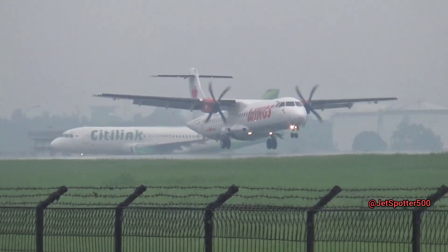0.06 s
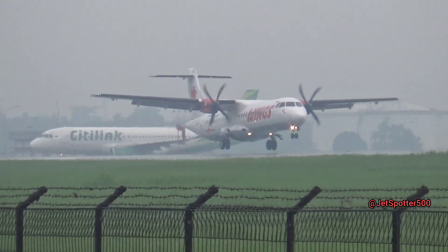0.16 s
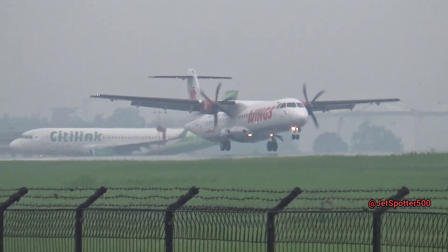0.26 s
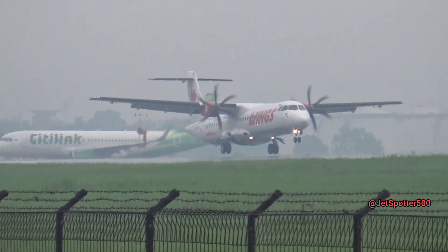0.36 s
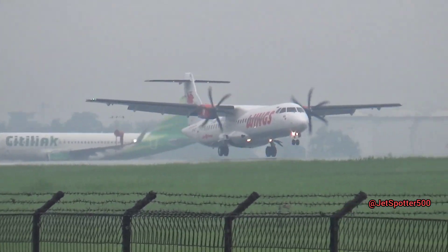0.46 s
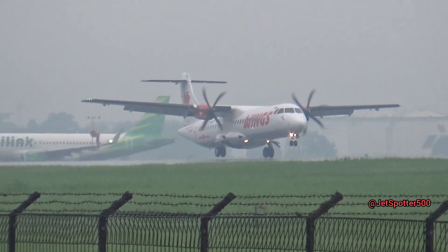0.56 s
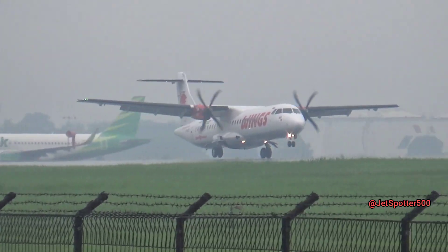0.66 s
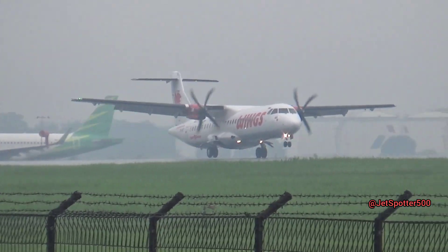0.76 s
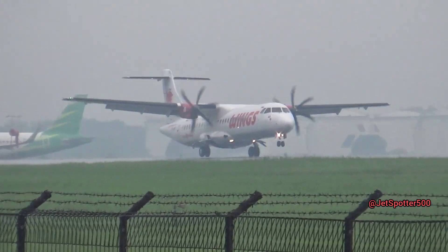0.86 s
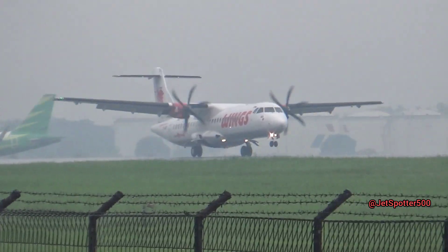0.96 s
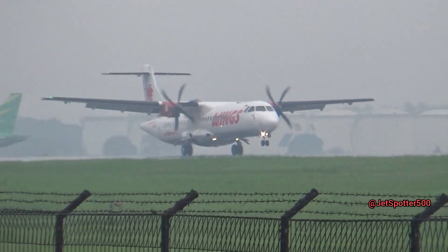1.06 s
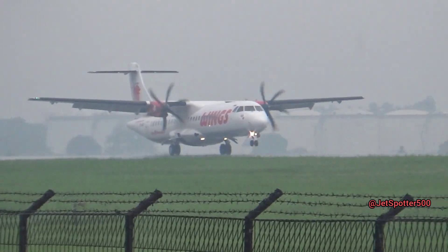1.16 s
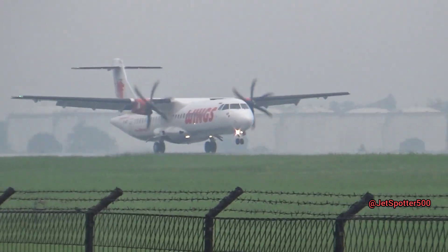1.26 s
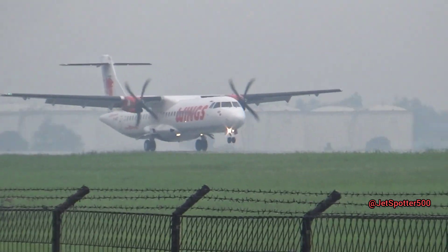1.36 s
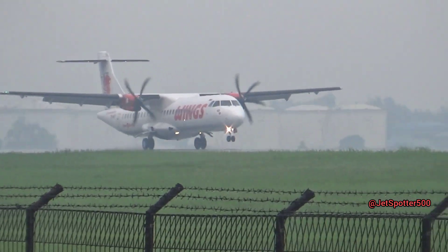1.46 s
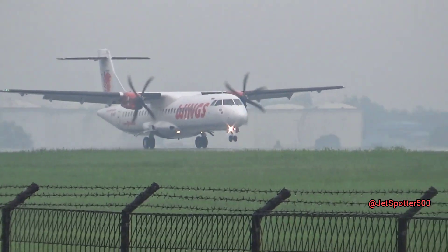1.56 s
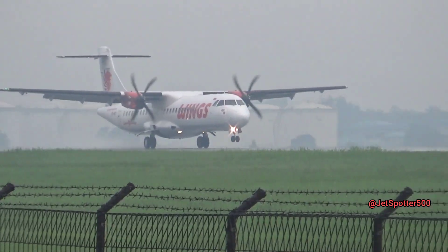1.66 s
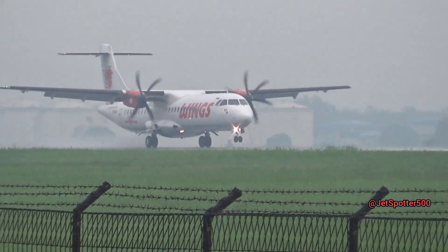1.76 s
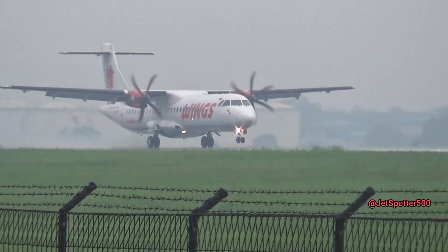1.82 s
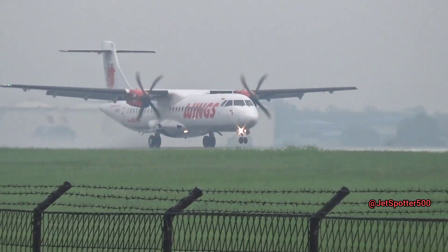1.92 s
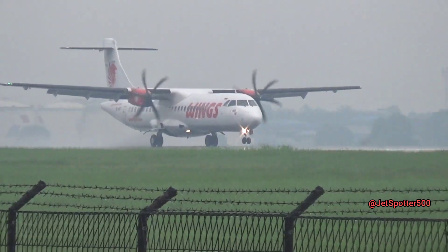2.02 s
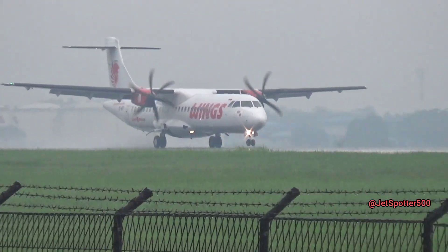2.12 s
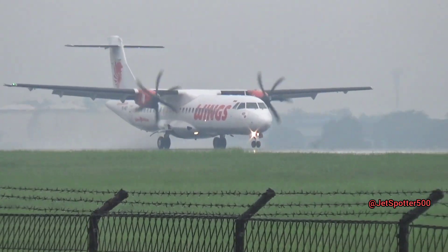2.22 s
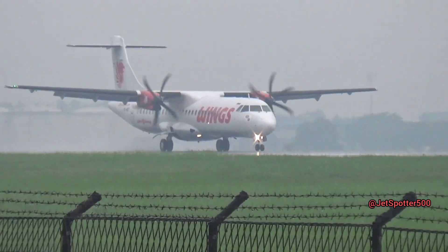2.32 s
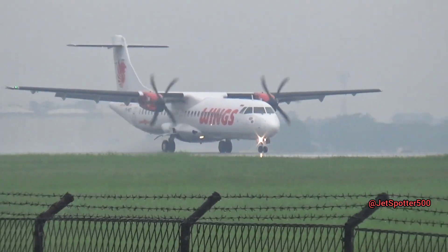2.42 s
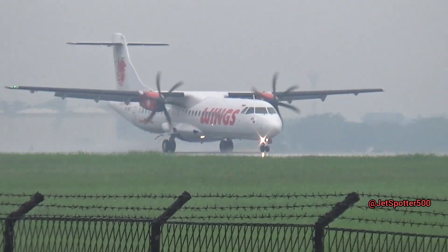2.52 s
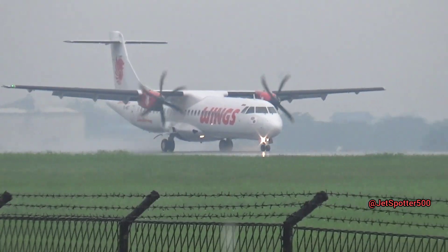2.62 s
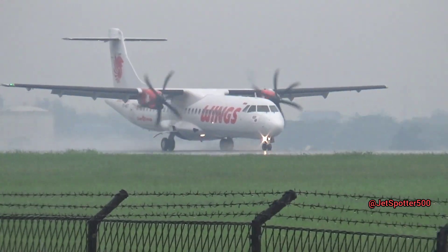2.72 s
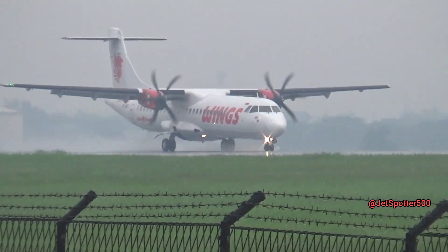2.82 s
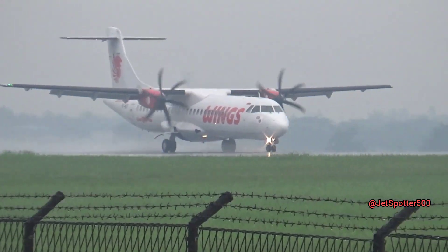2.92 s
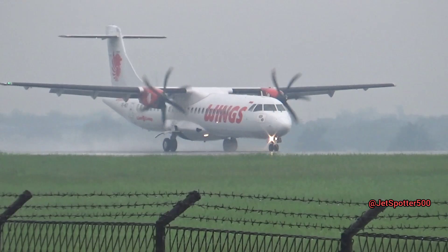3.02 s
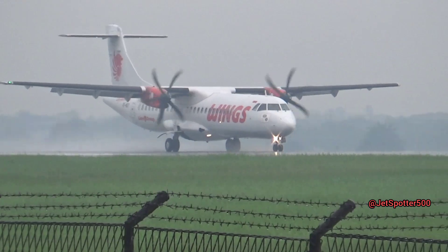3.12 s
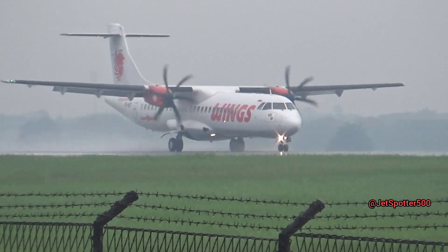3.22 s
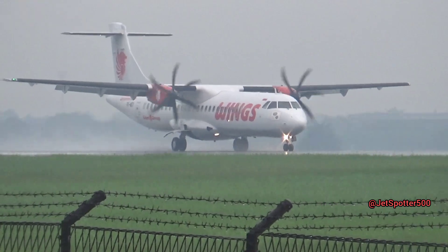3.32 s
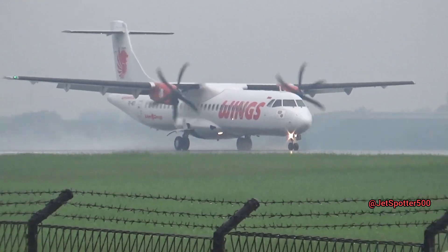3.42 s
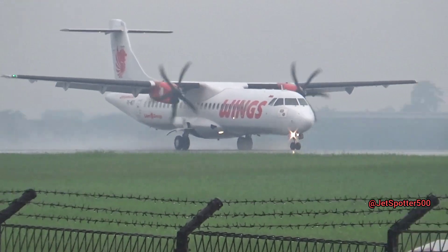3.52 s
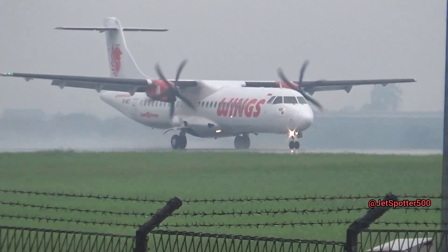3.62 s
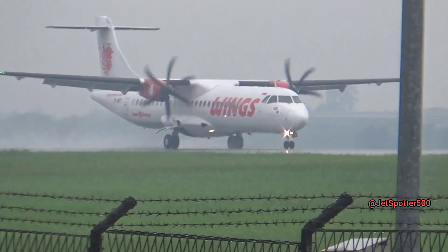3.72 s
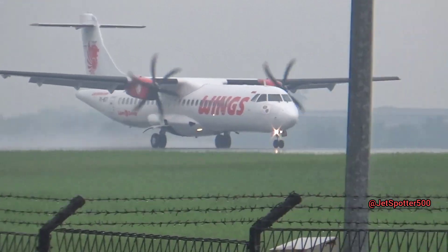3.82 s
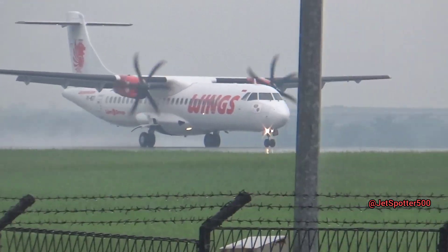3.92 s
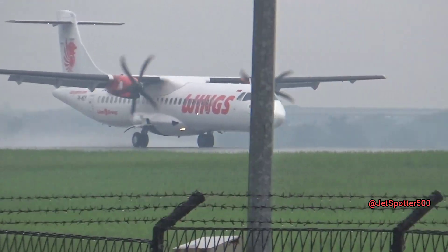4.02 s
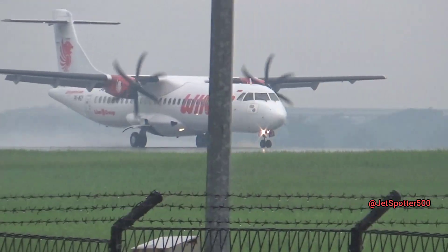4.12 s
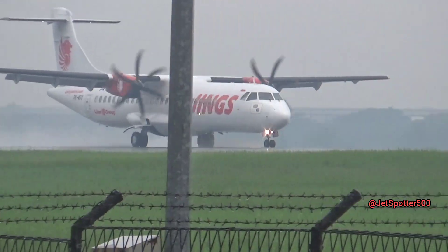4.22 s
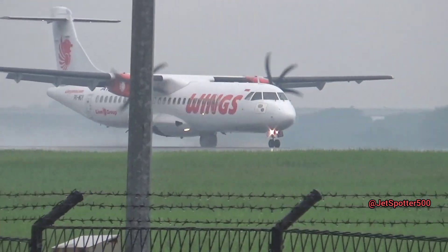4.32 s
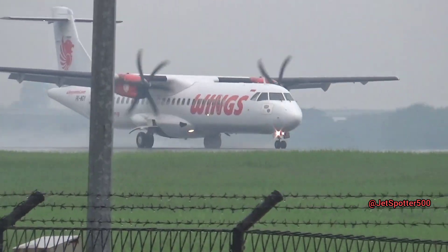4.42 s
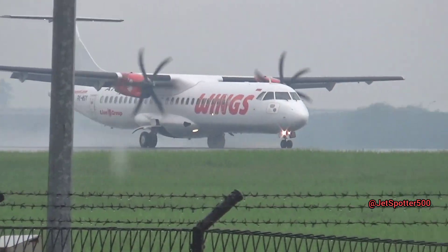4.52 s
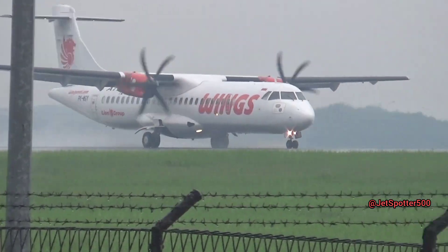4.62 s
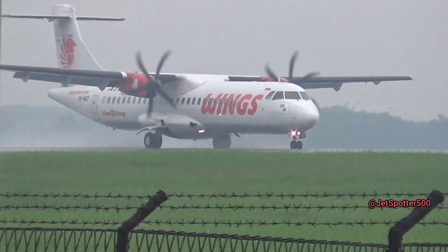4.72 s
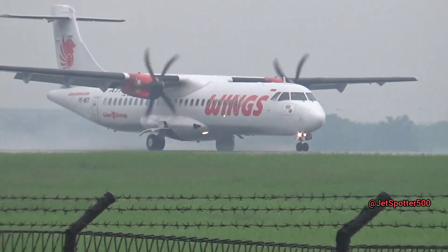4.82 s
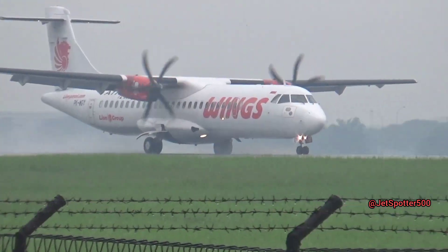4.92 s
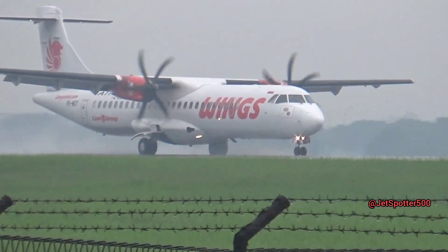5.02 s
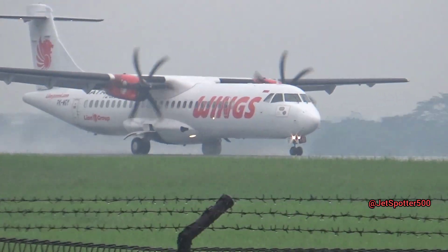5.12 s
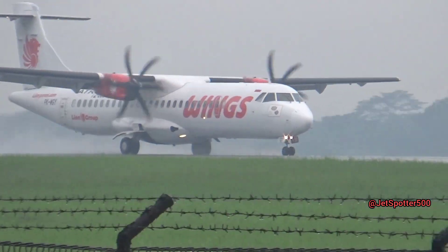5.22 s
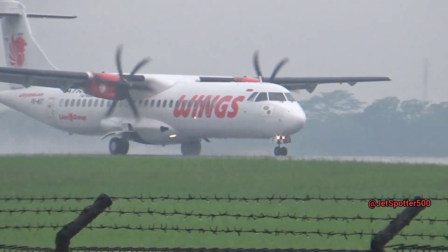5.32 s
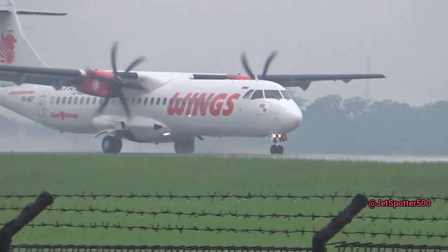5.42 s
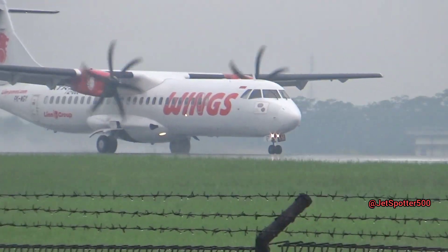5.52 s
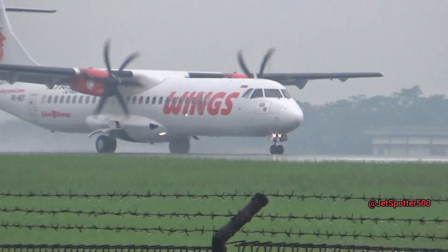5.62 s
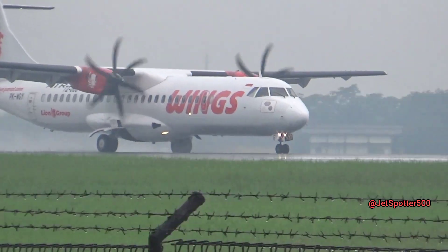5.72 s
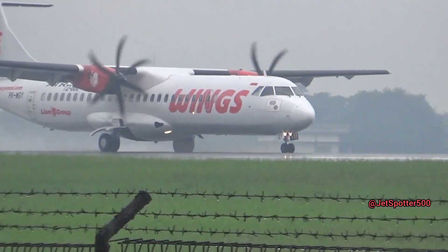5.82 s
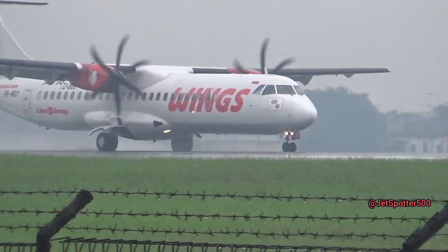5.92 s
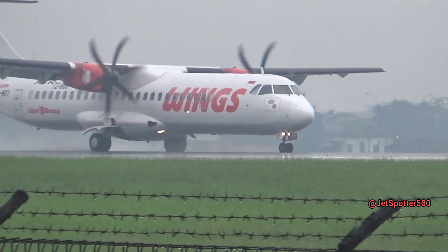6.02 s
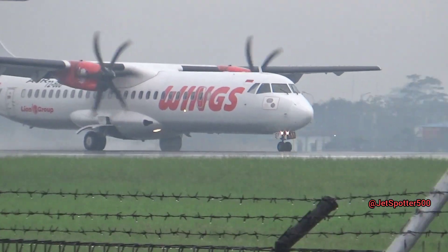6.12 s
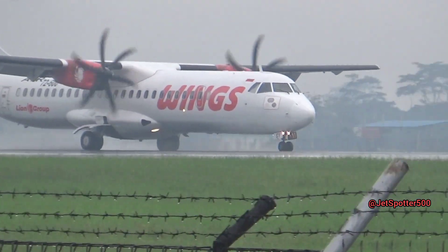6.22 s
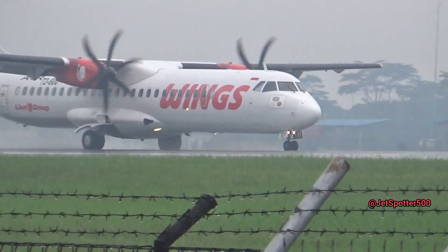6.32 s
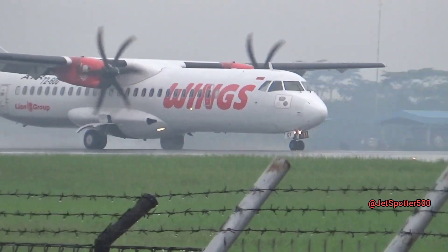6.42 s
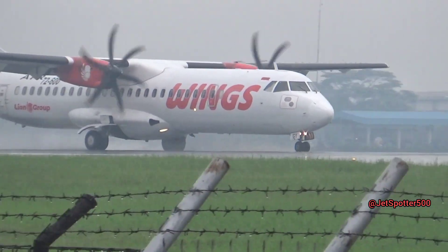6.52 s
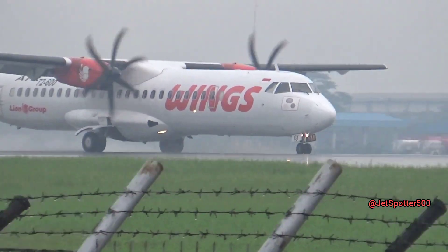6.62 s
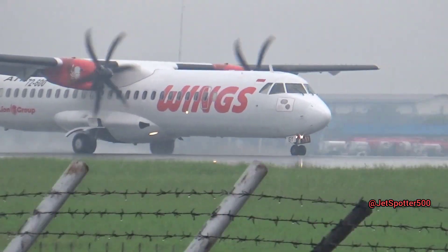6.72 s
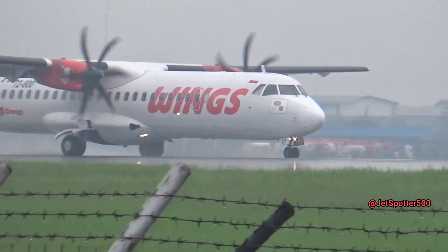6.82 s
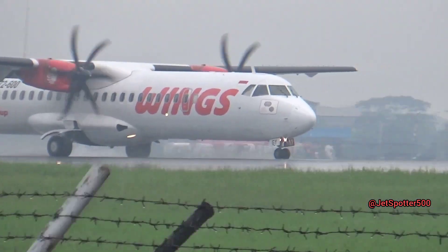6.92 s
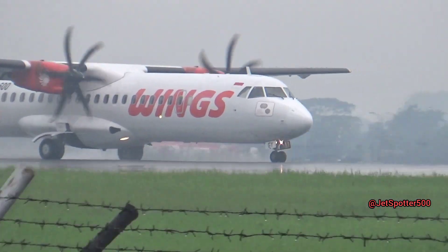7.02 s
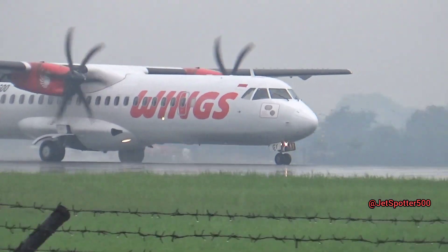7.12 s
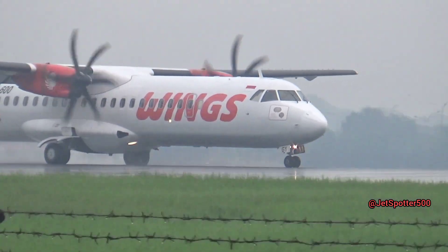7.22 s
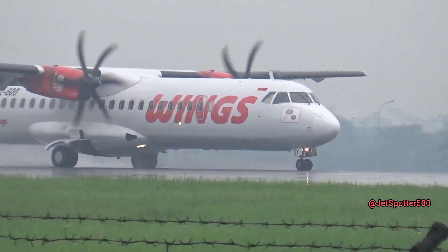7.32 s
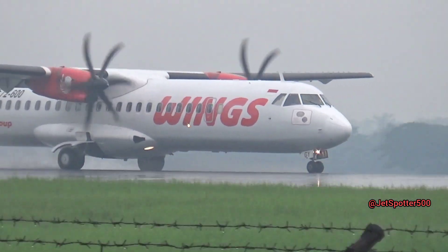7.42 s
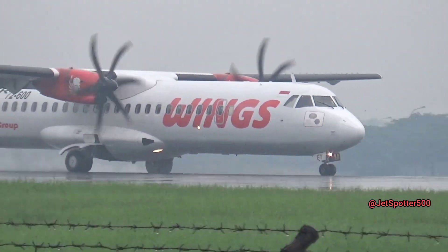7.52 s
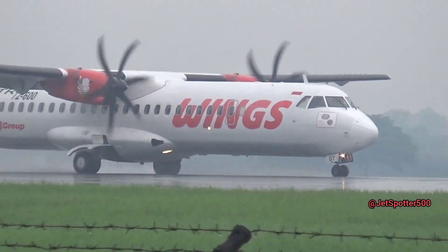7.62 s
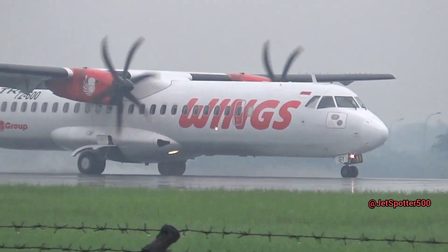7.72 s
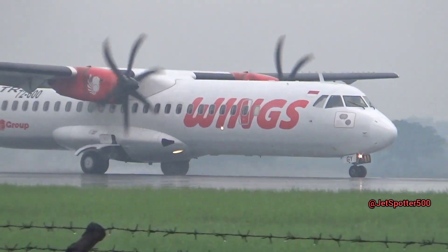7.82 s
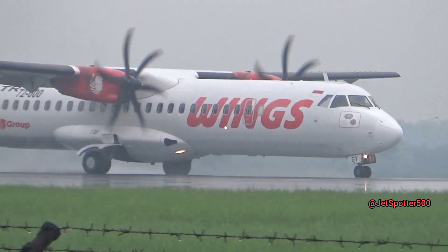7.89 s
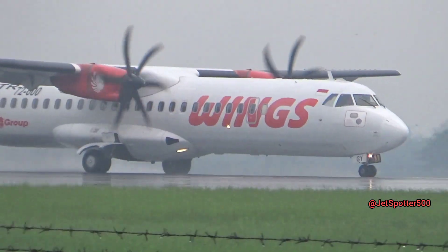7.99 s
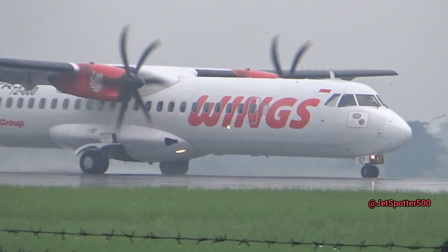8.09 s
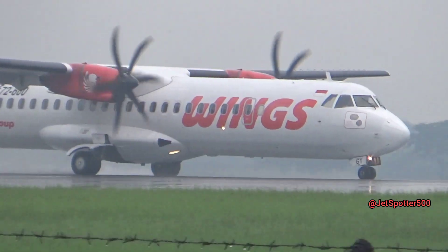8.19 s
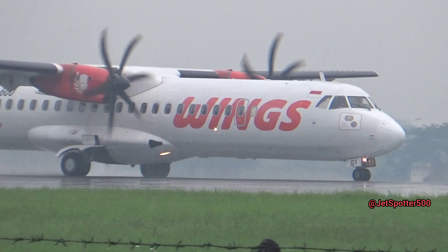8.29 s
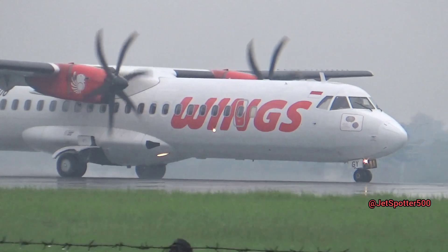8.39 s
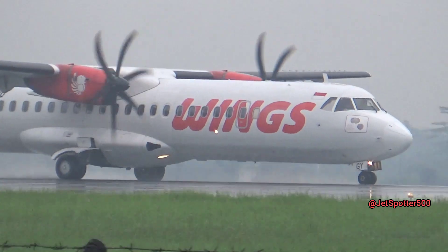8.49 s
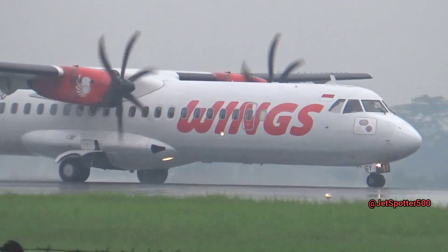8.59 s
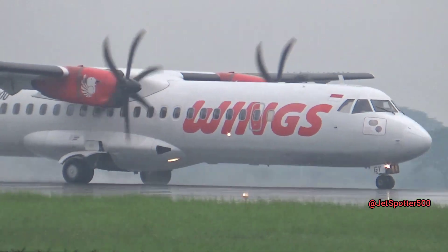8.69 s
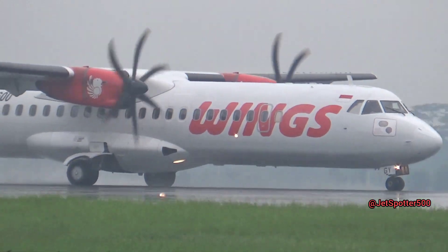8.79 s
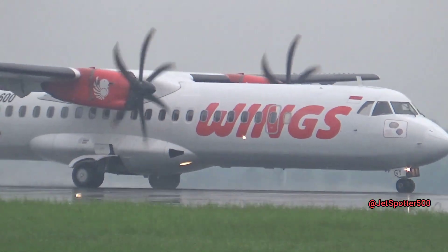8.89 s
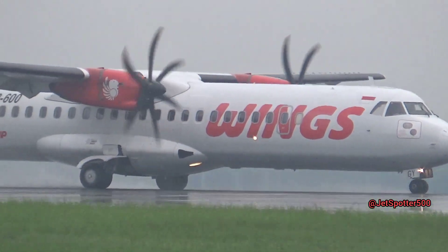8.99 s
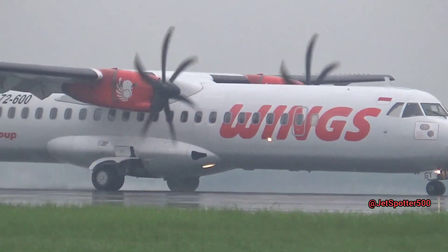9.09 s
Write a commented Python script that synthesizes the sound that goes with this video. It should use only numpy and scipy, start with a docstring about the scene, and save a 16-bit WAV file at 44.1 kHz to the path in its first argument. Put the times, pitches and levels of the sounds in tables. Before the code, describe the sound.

A turboprop airliner's distant rush grows into a loud propeller roar, with wet tyre swishes, a low hum and a late wavering whine.

```python
"""A twin turboprop lands on a wet runway and rolls toward the listener at the airfield fence.
At first small birds chirp over the quiet field, with two dry ticks and a sparse drizzle.
A far rush builds and the tyres swish through water. From about 4.5 s exhaust rumble and a low drone
come through, and the rush swells to a roar as the blades flatten to brake, over the hiss of spray.
In the last two seconds the compressor's whine flares and creeps up in pitch."""
import sys
import numpy as np
from scipy import signal
from scipy.fft import rfft, irfft, next_fast_len
from scipy.io import wavfile
from scipy.ndimage import uniform_filter1d, map_coordinates

SR = 44100
rng = np.random.default_rng(int(sys.argv[2]) if len(sys.argv) > 2 else 0)


def digitize_waveform(pressure):
    """Quantize a signal to 16-bit integers and store it at the path in sys.argv[1].

    Rows of a 2-D input are taken as channels; values are limited to [-1, 1].
    """
    field = np.atleast_2d(pressure).T
    bounded = np.clip(field, -1, 1)
    quanta = np.round(bounded * 32767).astype(np.int16)
    wavfile.write(sys.argv[1], SR, quanta)


N = 403515


def amp(db):
    """Decibels to gain."""
    return 10 ** (np.asarray(db) / 20)


def unit(x):
    """Scale to rms 1."""
    return x / np.sqrt(np.mean(x ** 2) + 1e-20)


def clock():
    """Seconds at each sample."""
    return np.arange(N) / SR


def along(points, hz):
    """Read a curve of (Hz, value) points on a log frequency axis."""
    point_hz, values = np.transpose(points)
    return np.interp(np.log(hz + 1), np.log(point_hz + 1), values)


def curves(rows):
    """One automation curve for each column after the time."""
    times, *columns = np.transpose(rows)
    return [np.interp(clock(), times, column) for column in columns]


def wobble(rate):
    """A smooth random curve, rate knots a second."""
    knots = rng.standard_normal(int(N * rate / SR) + 4)
    return map_coordinates(knots, [clock() * rate], mode="nearest")


def swell(peak_s, half_width_s):
    """A bell-shaped rise and fall."""
    return np.exp(-2 * ((clock() - peak_s) / half_width_s) ** 2)


def fade_in(start_s, length_s):
    """A ramp from silence to full."""
    return np.clip((clock() - start_s) / length_s, 0, 1)


def hump(hz, centre_hz, width_hz):
    """A resonant peak of height 1."""
    return 1 / (1 + ((hz - centre_hz) / width_hz) ** 2)


def below(hz, edge_hz, order=8):
    """A soft low-pass curve, one half at the edge."""
    return 1 / (1 + (hz / edge_hz) ** order)


def filtered(x, response):
    """EQ x with a gain given as a function of frequency."""
    size = next_fast_len(N + 8192)
    return irfft(rfft(x, size) * response(np.fft.rfftfreq(size, 1 / SR)), size)[..., :N]


def noise(gain, likeness=None):
    """Nearly mono stereo noise of rms 1, coloured by a gain of frequency."""
    # The default, narrow image. Each row: frequency in Hz, left-right likeness (1 is mono).
    narrow_image = [(60, 0.96), (450, 0.99), (1100, 0.97), (4500, 0.96), (5800, 0.96), (6800, 1)]

    def colour(hz):
        spread = np.arccos(np.clip(along(likeness or narrow_image, hz), -1, 1)) / 2
        return gain(hz) * np.array([np.cos(spread), np.sin(spread)])
    mid, side = filtered(rng.standard_normal((2, N)), colour)
    return unit(np.array([mid + side, mid - side]))


def tone(hz):
    """A sine of rms 1 that follows a pitch curve."""
    return np.sqrt(2) * np.sin(2 * np.pi * np.cumsum(hz) / SR)


def add(track, start_s, sound):
    """Mix a short sound into a track."""
    part = track[max(round(start_s * SR), 0):][:len(sound)]
    part += sound[:len(part)]


def field(level_db=-55.0, sizzle_hz=9200, sizzle_db=-68):
    """The bed: distant airport rumble and soft hiss, with a thin high sizzle."""
    # The open airfield's colour. Each row: frequency in Hz, relative level in dB.
    bed_eq = [(20, -26), (40, -11), (62, 1.5), (105, 2.5), (140, -1), (215, 1), (380, -10), (600, -4),
              (1400, -7.5), (3300, -6), (4400, -18.5), (6200, -12), (7000, -16.5), (9600, -14.5),
              (15500, -29)]
    # Its stereo image. Each row: frequency in Hz, left-right likeness (1 is mono).
    image = [(150, .998), (420, 0.88), (1000, 0.8), (8000, 0.76), (14000, .995)]
    bed = amp(level_db + 0.49 * wobble(4.5)) * noise(lambda hz: amp(along(bed_eq, hz)), image)
    sizzle = amp(sizzle_db + wobble(5.7)) * noise(lambda hz: hump(hz, sizzle_hz, 300), image)
    return bed + sizzle


def drizzle(count=70, t60=.004):
    """Sparse tiny drops land close by, each a bright pinprick of noise."""
    drops, t = np.zeros(N), np.arange(SR // 200) / SR
    for when, size in rng.random((count, 2)):
        envelope = amp(-53 + 11 * size ** 2 - 60 * t / t60)
        add(drops, when * N / SR, envelope * rng.standard_normal(len(t)))
    return filtered(drops, lambda hz: hump(hz, 8000, 4500))


def ticks(ring_hz=1700, ring_t60=.004, crack_t60=.03):
    """Small dry ticks close by: a crack and a very short hollow ring."""
    # Each row: start in seconds, relative level in dB.
    hits = [(0.613, -37), (.94, -41)]
    track, t = np.zeros(N), np.arange(SR // 20) / SR
    ring = np.sin(2 * np.pi * ring_hz * t) * amp(-60 * t / ring_t60)
    for start_s, db in hits:
        crack = .45 * rng.standard_normal(len(t)) * amp(-60 * t / crack_t60)
        add(track, start_s, amp(db) * (ring + crack))
    return filtered(track, lambda hz: (0.18 + 1.4 * hump(hz, ring_hz, 1100)) * below(hz, 11000))


def far_bird(pip_hz=5280, width_hz=330, spacing_s=0.041, half_width_s=0.017):
    """A bird calls in triple pips; distance smears each into a narrow puff of sound."""
    # Each row: peak of the first pip in seconds, level in dB.
    calls = [(.42, -60), (.62, -58), (.85, -59), (1.086, -61), (1.33, -59), (1.56, -59), (1.79, -61)]
    pips = sum(amp(db) * np.exp(-((clock() - s - k * spacing_s) / half_width_s) ** 2)
               for s, db in calls for k in range(3))
    return pips * noise(lambda hz: hump(hz, pip_hz, width_hz))


def birds(reverb_db=-5, t60=.25):
    """Small birds sing quick, slightly hoarse sliding notes with a short stereo tail."""
    # Each row: start in seconds, length in seconds, start and end pitch in Hz, relative level in dB.
    notes = [(.004, .024, 4300, 3400, -48), (0.048, .028, 4800, 5900, -45), (.149, .012, 4300, 3500, -48),
             (.169, 0.02, 3420, 4300, -41), (.212, .032, 3950, 3200, -44), (0.288, .02, 4050, 3500, -46),
             (.314, 0.03, 4100, 2600, -45), (0.368, .024, 3900, 2900, -48), (1.52, .11, 7700, 7600, -61),
             (1.58, 0.033, 4450, 4730, -50), (1.748, .04, 4960, 4750, -46), (1.81, .14, 7750, 7650, -59),
             (1.995, .024, 4200, 3500, -48), (2.078, .022, 5100, 5660, -44.5),
             (2.16, 0.092, 7650, 7600, -60), (2.2, 0.02, 3470, 4100, -44), (2.315, .022, 4200, 3450, -48)]
    song = np.zeros(N)
    hoarseness = 1 + .025 * wobble(900)
    for start_s, length_s, start_hz, end_hz, db in notes:
        glide = np.linspace(start_hz, end_hz, max(int(length_s * SR), 2))
        pitch_hz = glide * hoarseness[max(round(start_s * SR), 0):][:len(glide)]
        envelope = np.sqrt(np.hanning(len(glide)).clip(0))
        add(song, start_s, amp(db - 7.5) * envelope * tone(pitch_hz))
    t = np.arange(SR // 2) / SR
    tail = rng.standard_normal((2, len(t))) * amp(-60 * t / t60)
    reverb = signal.fftconvolve(song[None], tail / np.linalg.norm(tail[0]), axes=1)[:, :N]
    return song + amp(reverb_db) * reverb


def tyres():
    """The tyres meet sheets of water in short swishes; the last two, near 5 s, are treble surges of the
    aircraft's rushing air."""
    # Each row: peak time and half-width in seconds, band centre and half-width in Hz, level in dB.
    swishes = [(.75, .15, 2560, 250, -60), (1.25, 0.37, 2500, 300, -55.5), (1.4, 0.1, 3300, 300, -55),
               (1.5, 0.66, 1050, 220, -61), (1.966, 0.21, 2220, 600, -52.5), (2.39, 0.19, 2270, 553, -46),
               (2.536, .04, 2600, 220, -47), (2.62, 0.38, 980, 200, -54.5), (2.72, 0.56, 2200, 550, -51),
               (4.12, 0.15, 1900, 150, -50), (4.3, 0.94, 3280, 300, -52.5), (5.03, 0.18, 2880, 350, -35.5),
               (5.305, 0.12, 2970, 350, -33)]
    return sum(amp(db) * swell(peak_s, half_s) * noise(lambda hz: hump(hz, centre_hz, width_hz))
               for peak_s, half_s, centre_hz, width_hz, db in swishes)


def engine_hum(start_s=4.5, fade_s=0.67, rumble_db_per_s=3.5, drone_db_per_s=0.8):
    """Exhaust rumble grows steadily out of the field, with the low unsteady drone of the engines."""
    # The exhaust's colour. Each row: frequency in Hz, relative level in dB.
    exhaust_eq = [(20, -25), (45, -19), (65, -15), (110, -14), (135, 4.5), (200, -0.5), (280, 0),
                  (400, -15), (800, -50)]
    # The drone's partials. Each row: multiple of the base pitch, relative level in dB.
    partials = [(2, -6), (3, -4), (5, -0.5)]
    age = clock() - start_s
    boom_db = 4.5 * swell(8.98, 0.11)  # one swell as the aircraft draws level
    rumble_db = -58.5 + rumble_db_per_s * age + boom_db + 0.76 * wobble(6)
    rumble = amp(rumble_db) * noise(lambda hz: amp(along(exhaust_eq, hz)))
    sag_hz = 7 / (1 + np.exp((7.15 - clock()) / 0.314))  # the pitch sags as the aircraft slows
    base_hz = (50.3 - sag_hz) * (1 + 0.0076 * wobble(7))
    drone_db = -59 + drone_db_per_s * age
    drone = sum(amp(drone_db + db + 1.8 * wobble(3.4)) * tone(k * base_hz) for k, db in partials)
    return fade_in(start_s, fade_s) * (rumble + drone)


def turbine(start_s=7.6, fade_s=.7, start_hz=5480, climb_hz_per_s=112):
    """The compressor's whine creeps up in pitch and flares, a wavering line inside a turbulent skirt."""
    # Each row: peak time in seconds, half-width in seconds, relative level in dB.
    flares = [(7.506, 0.045, -29), (7.903, 0.054, -30.5), (8.15, .07, -37), (8.33, .03, -43),
              (8.6, 0.11, -38), (8.957, 0.1, -37.5), (9.13, .07, -31.5)]

    def skirt(width_hz):
        return noise(lambda hz: hump(hz, 0, width_hz))
    pitch_hz = (start_hz + climb_hz_per_s * (clock() - start_s)) * (1 + 0.00134 * wobble(40))
    level = amp(-33.5) * fade_in(start_s, fade_s)
    level += sum(amp(db) * swell(peak_s, half_s) for peak_s, half_s, db in flares)
    line = amp(-6 + 4.2 * wobble(14))
    # Ring-modulating low noise wraps a breathy band around the pitch.
    whine = (line + amp(-7) * skirt(70) + amp(-1.5) * skirt(230)) * tone(pitch_hz)
    octave = amp(-14) * skirt(450) * tone(2 * pitch_hz)
    return level * (whine + octave)


def shimmer(x, depth_db=1.16, size=2048):
    """Uneven air on the way lifts and sinks narrow bands for a few tenths of a second."""
    spectrogram = signal.stft(x, nperseg=size)[2]
    patches = uniform_filter1d(rng.standard_normal(spectrogram.shape[1:]), size=3, axis=0)
    patches = uniform_filter1d(patches, size=14, axis=1)
    return signal.istft(spectrogram * amp(depth_db * unit(patches)), nperseg=size)[1][:, :N]


def airflow(power_share):
    """One register of the aircraft's turbulence; its colour crossfades as the aircraft comes closer."""
    # Its colour from afar, halfway and close by. Each row: frequency in Hz, relative level in dB.
    far_eq = [(180, -46), (300, -12), (380, -14.5), (540, -3.5), (680, -4.5), (900, 1.5), (1250, 2.5),
              (1700, 1), (2050, -1), (3400, -6), (4100, -8.5), (5640, -10), (7900, -19.5), (9200, -15.5),
              (10600, -27), (13000, -37)]
    halfway_eq = [(120, -51), (200, -32.5), (290, -18.5), (370, -6.5), (520, -0.5), (720, -2), (950, 0.5),
                  (1600, -6), (2000, -5), (3100, -4.5), (3800, -8), (6300, -8.5), (7670, -17), (9150, -16),
                  (13500, -43.5)]
    close_eq = [(150, -40), (290, -20), (420, -3), (520, 1), (690, -1), (1000, 0.5), (1230, -3),
                (1870, -4.5), (3200, -9.5), (4300, -13.5), (5900, -11.5), (7150, -16.5), (9600, -19.5),
                (11300, -30), (13500, -47.5)]
    # Steady peaks that make it sound hollow. Each row: centre in Hz, half-width in Hz, boost in dB.
    hollows = [(560, 70, 1.5), (860, 70, 2), (1410, 100, 3), (1850, 100, 3.5), (2280, 110, 2),
               (2850, 200, 1)]

    def boost_db(hz):
        return sum(db * hump(hz, centre_hz, width_hz) for centre_hz, width_hz, db in hollows)
    stage = np.interp(clock(), [4.4, 4.95, 6.3, 7.6], [0.026, 1, 1, 2])  # 0 far, 1 halfway, 2 close
    rush = np.zeros((2, N))
    for k, eq in enumerate([far_eq, halfway_eq, close_eq]):
        crossfade = np.sqrt(np.clip(1 - abs(stage - k), 0, 1))
        rush += crossfade * noise(lambda hz: amp(along(eq, hz) + boost_db(hz)) * np.sqrt(power_share(hz)))
    return rush


def propellers_and_spray(roar_top_hz=1050, rasp_top_hz=3400):
    """Stalling blades roar and rasp, the spray hisses; moving air makes the treble surge and flutter."""
    # Fader rides for the approach. Each row: time in seconds, then roar, rasp and hiss in relative dB.
    faders = [(0, -73, -64.5, -60.5), (1.4, -56, -57.5, -58), (2.65, -52, -48.5, -54.5),
              (3.15, -55, -54, -54), (3.5, -54.5, -51, -53), (3.85, -50, -45, -47.5),
              (4.42, -47, -41, -45.5), (4.72, -37, -38.5, -46.5), (4.87, -35.5, -38, -41),
              (5.03, -33.5, -32, -34.5), (5.2, -32, -31.5, -36), (5.6, -32, -33, -36.5),
              (5.98, -31.5, -27, -29), (6.62, -25.5, -23.5, -28.5), (6.85, -22, -21, -27),
              (7.6, -19.5, -18.5, -27), (8.15, -18, -18.5, -25.5), (9.15, -18.5, -18.5, -25)]
    # Surges of treble. Each row: peak time in seconds, half-width in seconds, boost of the hiss in dB.
    surges = [(5.01, 0.1, 4), (5.296, 0.16, 5.5), (5.73, 0.065, 3.5), (5.994, 0.087, 1.5),
              (6.272, 0.097, 3.5), (6.496, 0.077, 2), (6.736, 0.098, 3.5), (6.91, 0.089, 3.5),
              (7.297, 0.068, 2), (7.51, 0.04, 2.5), (7.898, 0.13, 2.5), (8.096, 0.093, 3.5),
              (8.556, 0.17, 1.5)]
    roar_db, rasp_db, hiss_db = curves(faders)
    surge_db = sum(db * swell(peak_s, half_s) for peak_s, half_s, db in surges)
    flutter = wobble(22)
    roar = airflow(lambda hz: below(hz, roar_top_hz))
    rasp = airflow(lambda hz: (1 - below(hz, roar_top_hz)) * below(hz, rasp_top_hz))
    hiss = airflow(lambda hz: 1 - below(hz, rasp_top_hz))
    spatter_db = 0.67 * wobble(130)
    return (amp(roar_db + 0.23 * flutter + 0.52 * wobble(12) - 0.55) * roar
            + amp(rasp_db + 0.27 * surge_db + .4 * flutter - 0.44) * rasp
            + amp(hiss_db + surge_db + 0.8 * flutter + spatter_db - 0.43) * hiss)


def scene():
    """The aircraft sits a little left, over birds and field; the damp air takes its highest treble."""
    # The aircraft's balance. Each row: frequency in Hz, left minus right in dB.
    balance = [(280, -0.3), (500, 0.4), (720, 0), (950, 0.6), (2000, 0.8), (3500, -0.6), (4400, 2.5),
               (6000, -0.5), (7000, -0.5)]

    def placement(hz):
        return amp(along(balance, hz) * np.array([[.5], [-.5]])) * below(hz, 13500, order=60)
    aircraft = shimmer(propellers_and_spray()) + engine_hum() + turbine() + tyres()
    return filtered(aircraft, placement) + birds() + far_bird() + ticks() + drizzle() + field()


def record(dry, top_hz=15700):
    """A brick-wall low-pass on the whole mix."""
    return filtered(dry, lambda hz: hz < top_hz)


dry = scene()
out = record(dry)
digitize_waveform(out)
```